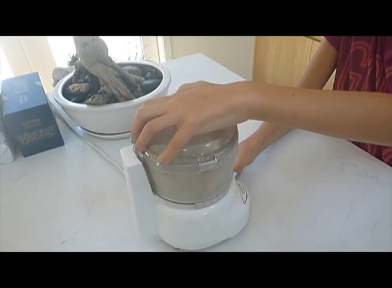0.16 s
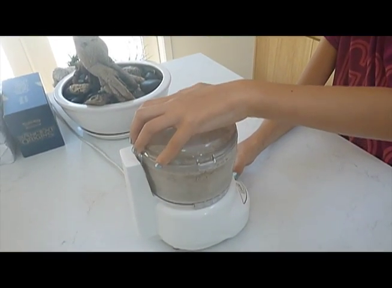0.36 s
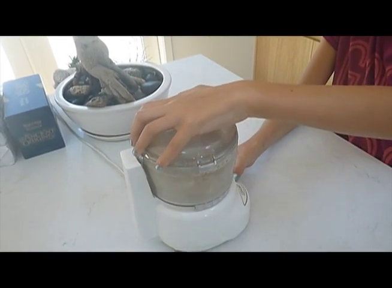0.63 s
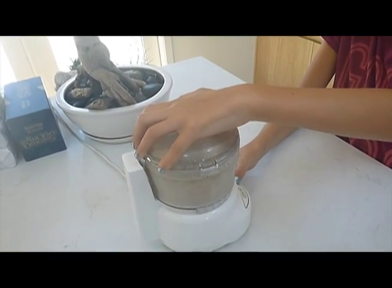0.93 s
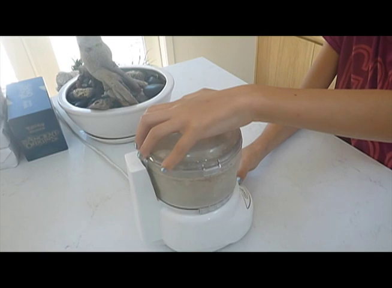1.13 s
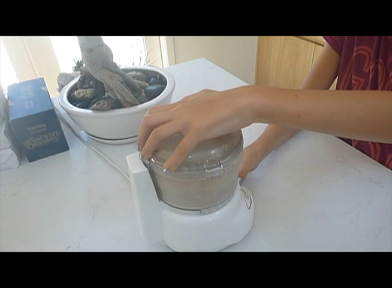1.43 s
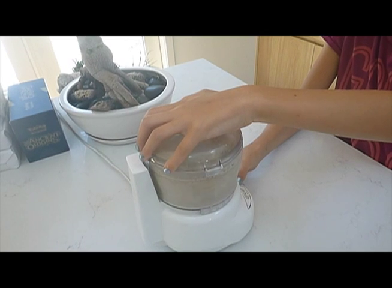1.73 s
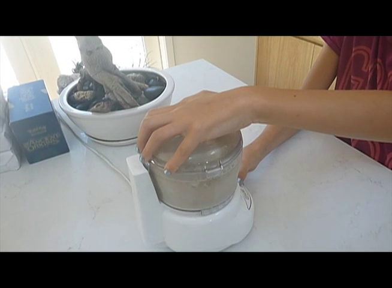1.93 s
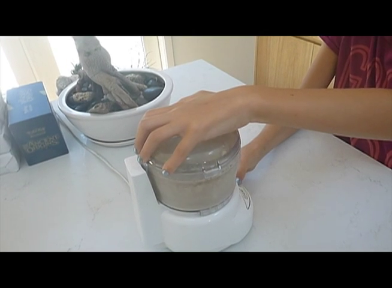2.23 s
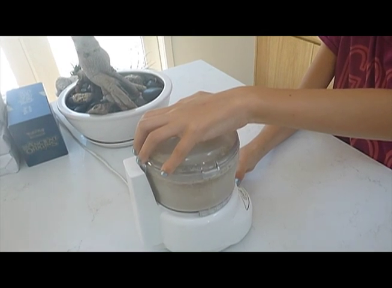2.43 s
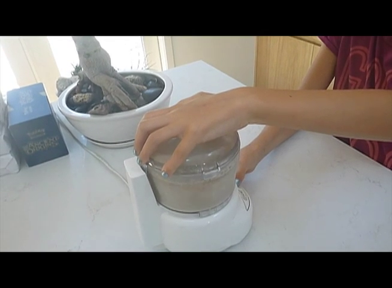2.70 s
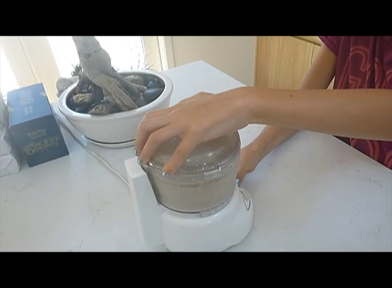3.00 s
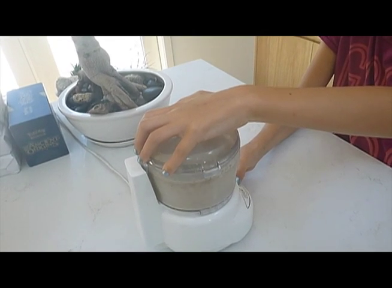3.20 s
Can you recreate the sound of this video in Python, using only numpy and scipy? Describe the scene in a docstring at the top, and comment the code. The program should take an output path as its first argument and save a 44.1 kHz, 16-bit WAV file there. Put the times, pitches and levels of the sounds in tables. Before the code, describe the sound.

A small electric food processor grinds nuts continuously for about 3.3 seconds, already running at the start and cut off while running. A dense gritty hiss and rattle fills the plastic bowl, strongest in the first 0.1 seconds. Sharp cracks cluster before 0.2, hit hard near 0.6, 1.97 and 2.75-2.95, and thin between 2.1 and 2.35. Dull knocks, brief lid rings and low wavering hum; close, centred, lightly reverberant kitchen.

```python
"""Food processor grinding nuts

A small electric food processor stands on a kitchen counter: two sine hum lines waver over low-passed noise.
Coloured random impacts are powder, crumbs and clumps whirled round a plastic bowl; ringing ticks are grit.
Hard pieces crack in noise bursts led by a click, clumps knock, and the lid rings in short sines.
Bowl resonances shape every contact, decaying sines thump the base, and a noise tail adds the room."""
import sys
import numpy as np
from scipy import signal
from scipy.fft import rfft, irfft
from scipy.io import wavfile

SR = 44100
rng = np.random.default_rng(int(sys.argv[2]) if len(sys.argv) > 2 else 0)


def to_wav(sig):
    """Store sig (one row per channel, or 1-D mono) as 16-bit WAV at the path in sys.argv[1].

    Samples outside -1..1 are clipped; the rate is SR.
    """
    pcm = np.clip(np.atleast_2d(sig), -1, 1) * 32767
    pcm = np.round(pcm).astype(np.int16)
    wavfile.write(sys.argv[1], SR, pcm.T)  # frames by channels


N = 147735  # samples, 3.35 s

# How hard the meal is thrown against the wall; only departures from the mean are used.
# Each row: time in seconds, level in dB.
LOAD = [(0.0, -30), (0.1, -29.5), (0.125, -36.5), (0.22, -31.5), (0.31, -34), (0.39, -33), (0.49, -31.5),
        (0.62, -33), (0.71, -32.5), (0.99, -33.5), (1.2, -33), (1.41, -33.5), (1.5, -32.5), (1.74, -34),
        (1.92, -32.5), (1.95, -30), (2.0, -33.5), (2.4, -33.5), (2.7, -32.5), (2.76, -31), (3.03, -33.5),
        (3.35, -33)]


def from_db(db):
    """Amplitude ratio: 20 dB is a factor of ten."""
    return 10 ** (np.asarray(db) / 20)


def rms_one(x):
    """Normalization: divide by the root mean square, giving unit power."""
    return x / np.sqrt(np.mean(x ** 2) + 1e-20)


def in_time(rows):
    """Linear interpolation: a control curve at every sample from rows of (seconds, value)."""
    return np.interp(np.arange(N) / SR, *np.transpose(rows))


def drift(rate_hz):
    """Low-pass noise: two equal poles leave slow random fluctuation of about unit spread."""
    step = 40  # samples between drawn values
    pole = np.exp(-2 * np.pi * step * rate_hz / SR)
    settling = 2000
    noise = rng.standard_normal(N // step + 2 + settling)
    slow = signal.lfilter([1], [1, -2 * pole, pole * pole], noise)[settling:]
    return np.interp(np.arange(N) / step, np.arange(len(slow)), rms_one(slow))


def load_swing():
    """Modulation depth: departure of the load from its mean, in dB."""
    load_db = in_time(LOAD)
    return load_db - load_db.mean()


def colour(x, spectrum):
    """Minimum-phase filtering: a folded cepstrum gives a causal response; white noise keeps its power."""
    size = 4096
    hz, db = np.transpose(spectrum)
    bin_hz = np.arange(size // 2 + 1) * SR / size
    gain = rms_one(from_db(np.interp(np.log(bin_hz + 1), np.log(hz), db)))
    cepstrum = irfft(np.log(gain))[:size // 2]
    cepstrum[1:] *= 2
    response = irfft(np.exp(rfft(cepstrum, size)))
    return signal.fftconvolve(x, response)[:N]


def grains(per_s, spread_db, largest):
    """Poisson-like impacts: random times, signs and exponentially spread dB sizes; unit power."""
    size_db = spread_db * np.minimum(rng.exponential(1, N), largest)
    impacts = from_db(size_db) * rng.choice([-1, 1], N)
    return rms_one(impacts * (rng.random(N) < per_s / SR))


def bursts(rows, length_s, edge_s):
    """Dense fracture: random-sign noise builds, holds and decays; the rise is twice as fast as the decay."""
    t, envelope = np.arange(N) / SR, np.zeros(N)
    for s, db in rows:
        near = slice(max(int((s - .04) * SR), 0), int((s + .08) * SR))
        outside = np.maximum(2 * (s - t[near]), t[near] - s - length_s)
        envelope[near] += from_db(db) * np.exp(-np.maximum(outside, 0) / edge_s)
    return envelope * rng.choice([-1, 1], N)


def kitchen(x):
    """Diffuse reverberation: convolution with decaying noise from counter and walls."""
    room_db, t60_s = -15.5, 0.23  # energy of the tail's response, time to fall by 60 dB
    t = np.arange(SR // 2) / SR
    tail = rng.standard_normal(len(t)) * from_db(-60 * t / t60_s)
    tail *= t > .003  # the first 3 ms are silent
    tail /= np.sqrt(np.sum(tail ** 2))
    return from_db(room_db) * signal.fftconvolve(x, tail)[:N]


def base():
    """Damped oscillation: a jolt sets the machine bouncing briefly on its feet."""
    # Thumps on the counter. Each row: start in seconds, level in dB before decay.
    thumps = [(.145, -48), (.596, -52), (1.011, -51), (2.755, -39)]
    thump_hz, decay_s = 62.3, 0.0052
    out = np.zeros(N)
    for s, db in thumps:
        age = np.maximum(np.arange(N) / SR - s, 0)
        out += from_db(db) * np.exp(-age / decay_s) * np.sin(2 * np.pi * thump_hz * age)
    return out


def motor():
    """Harmonic radiation: two wavering lines an octave apart swell over the rumble of the shaking housing."""
    # Motor speed before the wobble. Each row: time in seconds, pitch of the second harmonic in Hz.
    speed = [(0, 286.8), (.15, 283), (.35, 284), (.55, 291.2), (.8, 282), (1.05, 294), (1.2, 285.8),
             (1.6, 289.2), (1.9, 285.8), (2.15, 284.7), (2.55, 286.7), (3.05, 289.9), (3.35, 282.2)]
    # Second harmonic of the hum. Each row: time in seconds, level in dB before its trim.
    hum_upper = [(0.0, -67), (0.02, -39), (0.05, -54), (0.09, -44), (0.12, -65), (0.14, -51.5), (0.17, -59),
                 (0.19, -40), (0.3, -51.0), (0.38, -41.5), (0.69, -57), (0.73, -31), (0.75, -70),
                 (0.78, -41.5), (0.88, -50), (0.92, -37), (0.95, -48), (0.97, -39.5), (1.0, -50),
                 (1.14, -50), (1.17, -37), (1.18, -40.5), (1.35, -60), (1.65, -40.5), (1.67, -58),
                 (2.03, -40.5), (2.11, -51), (2.15, -38), (2.19, -47), (2.32, -66), (2.38, -43),
                 (2.52, -63.0), (2.54, -38.5), (2.721, -56), (2.731, -40), (2.83, -53), (2.85, -33.5),
                 (2.88, -52), (2.95, -44), (2.97, -44), (3.06, -43), (3.07, -48), (3.11, -34.5),
                 (3.13, -48), (3.239, -50), (3.28, -35.5), (3.31, -58), (3.34, -38.5)]
    # Fundamental of the hum. Each row: time in seconds, level in dB before its trim.
    hum_lower = [(0.0, -47), (0.03, -44.5), (0.33, -77), (0.63, -45), (0.67, -55), (0.86, -44), (1.1, -56),
                 (1.47, -51.0), (1.49, -58.5), (2.11, -56.5), (2.18, -52), (2.24, -57.5), (2.95, -53.5),
                 (2.99, -63), (3.34, -57)]
    # Rumble colour before the low-pass. Each row: frequency in Hz, relative density in dB per Hz.
    rumble_colour = [(25, -38), (65, -14), (100, -12.5), (150, 2), (205, -2), (245, -5), (295, 5),
                     (350, -10.5), (480, -22), (1000, -33)]
    upper_trim_db, lower_trim_db = -4.5, -4
    wobble = .016  # spread of the pitch as a share
    rumble_db = -51
    housing_hz = 615  # the housing radiates little above this

    upper_hz = in_time(speed) * (1 + wobble * drift(25.0))
    phase = np.pi * np.cumsum(upper_hz) / SR  # of the fundamental, half the tabulated pitch
    upper = in_time([(s, from_db(db + upper_trim_db)) for s, db in hum_upper]) * np.sin(2 * phase)
    lower = in_time([(s, from_db(db + lower_trim_db)) for s, db in hum_lower]) * np.sin(phase)
    hum = np.sqrt(2) * (upper + lower)  # the levels are RMS
    rumble = from_db(rumble_db + 2.5 * drift(7.8)) * colour(rng.standard_normal(N), rumble_colour)
    low_pass = signal.butter(4, housing_hz, fs=SR, output="sos")
    return hum + signal.sosfilt(low_pass, rumble)


def bowl(x):
    """Modal resonance: second-order peaks are the plastic bowl and lid, two deep dips what the bowl swallows."""
    # Resonances of bowl and lid. Each row: frequency in Hz, width in Hz, gain in dB before the overall trim.
    resonances = [(678, 47, 7.5), (820, 102, 7.5), (1017, 100, 6), (1500, 150, 3), (2215, 110, 6.5),
                  (2924, 177, 4), (3300, 270, 5.5), (4085, 550, 3.5), (5470, 293, 8.5), (5980, 167, 7),
                  (8020, 530, 3.5), (10570, 170, 3.5)]
    # Absorbed bands. Each row: frequency in Hz, width in Hz, gain in dB before the overall trim.
    notches = [(1912, 190, -32), (2400, 115, -27)]
    for hz, width_hz, db in list(resonances) + list(notches):
        damping, cosine, gain = np.pi * width_hz / SR, np.cos(2 * np.pi * hz / SR), from_db(db)
        zeros = [1 + damping * gain, -2 * cosine, 1 - damping * gain]
        poles = [1 + damping, -2 * cosine, 1 - damping]
        x = signal.lfilter(zeros, poles, x)
    return x * from_db(-4)


def lid():
    """Impulse response: each piece flung upward makes the lid's ring swell and die at a random pitch."""
    # Hits on the lid. Each row: start in seconds, peak level in dB before trim and bowl.
    lid_hits = [(0.368, -23), (0.617, -26.5), (.657, -27.5), (1.184, -24.5), (1.472, -27), (1.949, -33),
                (2.36, -27), (2.524, -26.5), (2.581, -29), (2.672, -26), (2.953, -33)]
    ring_hz, trim_db, rise_s = 2225, -3, .0015
    pitch_spread = 0.024  # a share, scaled by the draw below
    out = np.zeros(N)
    for s, db in lid_hits:
        age = np.maximum(np.arange(N) / SR - s, 0)
        hz = ring_hz * (1 + pitch_spread * rng.uniform(-1.3, 1))
        swell = age / rise_s * np.exp(1 - age / rise_s)  # peaks at 1 after the rise
        out += from_db(db + trim_db) * swell * np.sin(2 * np.pi * hz * age)
    return out


def knocks():
    """Soft impact: a longer, rounded contact makes larger clumps land dully on the wall."""
    # Knocks of clumps. Each row: start in seconds, level in dB before trim, colour and bowl.
    knock_rows = [(0.029, -29), (0.49, -37), (0.529, -30), (0.723, -32), (0.876, -30.5), (1.155, -32),
                  (1.341, -31), (1.472, -36), (1.493, -33), (1.716, -30.5), (1.777, -36), (2.581, -35),
                  (2.674, -31), (3.291, -34)]
    # Knock colour. Each row: frequency in Hz, relative density in dB per Hz.
    knock_colour = [(60, -29), (200, 17.5), (450, -9), (780, 12.5), (1300, -10.5), (1800, -9), (3200, -0.5),
                    (8000, -7)]
    trim_db, length_s, edge_s = -5, 0.006, 0.0018
    levels = [(s, db + trim_db) for s, db in knock_rows]
    return colour(bursts(levels, length_s, edge_s), knock_colour)


def grit(count=9):
    """Struck resonators: hard grains excite one of several pitches for a few cycles, more often under load."""
    grit_db, per_s = -42.5, 240  # level before the bowl, rate at mean load in dB
    low_hz, high_hz = 2980, 13700
    cycles = 24  # cycles in which a ring falls by 60 dB
    tilt_db = 1  # rise towards the high pitches

    born = rng.random(N) < per_s * from_db(load_swing()) / SR
    size_db = 3.8 * np.minimum(rng.exponential(1, N), 2.5)
    clicks = born * from_db(size_db) * rng.choice([-1, 1], N)
    dealt, out = rng.integers(0, count, N), np.zeros(N)
    for k, hz in enumerate(np.geomspace(low_hz, high_hz, count)):
        radius, angle = from_db(-60 * hz / (cycles * SR)), 2 * np.pi * hz / SR
        struck = clicks * (dealt == k) + 1e-18 * rng.random(N)  # inaudible floor keeps the power above zero
        ring = signal.lfilter([1, 0, -1], [1, -2 * radius * np.cos(angle), radius * radius], struck)
        out += from_db(tilt_db * k / count) * rms_one(ring)
    return from_db(grit_db) * rms_one(out)


def cracks():
    """Brittle fracture: hard pieces break on the blade in one sharp impulse, a bright snap and a crush."""
    # Cracks. Each row: start in seconds before a common delay, level in dB before trim, colour and bowl,
    # level of the bright snap in dB relative to the crack before its own trim.
    crack_rows = [(0.0017, -20.5, -10), (0.01, -21, -4), (0.0397, -12.5, -10), (0.06, -23, -11),
                  (0.0813, -17, -5), (0.095, -15.5, -11), (0.1068, -22, -7), (0.1429, -15, 2),
                  (0.1803, -19.5, 2), (0.2057, -20, 2), (0.348, -14.5, -6), (0.367, -21.5, -12),
                  (0.486, -21, -8), (0.5003, -20, -6), (0.5408, -20, 1), (0.5551, -16.5, 3),
                  (0.5938, -10.5, 0), (0.682, -18.5, -14), (0.7028, -19, -5), (0.7208, -17, -12),
                  (0.734, -23, 2), (0.8186, -17.0, -12), (0.8737, -22, -8), (0.9266, -16.5, 2),
                  (1.01, -17.5, 9), (1.15, -17.5, -12), (1.1827, -20, -10), (1.3398, -19.5, -1),
                  (1.3544, -17.5, -12), (1.3773, -19, -10), (1.3954, -17, -4), (1.4923, -17.5, -12),
                  (1.5556, -17.5, 2.5), (1.5878, -20.5, 9.5), (1.6198, -19, -12), (1.6905, -19.5, -10),
                  (1.759, -23.5, 3), (1.8222, -18.5, -9), (1.9403, -29, -6), (1.9673, -13.5, -18),
                  (2.065, -37, -13), (2.3504, -21, -3), (2.579, -20.5, -12), (2.67, -20.5, -13),
                  (2.7307, -16.5, -2), (2.7722, -13.5, -15.5), (2.8387, -23, -11), (2.9124, -20.5, -45),
                  (2.9506, -14, -24), (2.9853, -18, 0.5), (3.3063, -22.0, 2), (3.3214, -21, -13)]
    # Crack colour. Each row: frequency in Hz, relative density in dB per Hz.
    crack_colour = [(60, -66), (480, -9.5), (1500, -6.5), (3000, 5.5), (4800, 3.5), (7000, -4),
                    (11500, -18), (15000, -8)]
    trim_db, delay_s, length_s, edge_s = -8.5, 0.001414, .0025, 0.00073
    fracture_db, snap_trim_db, snap_hz = 10.5, 0.5, 8300

    s, db, snap_db = np.transpose(crack_rows)
    s, db = s + delay_s, db + trim_db
    fracture = np.zeros(N)
    fracture[np.clip(s * SR, 0, N - 1).astype(int)] = from_db(db + fracture_db)
    crush = colour(fracture + bursts(zip(s, db), length_s, edge_s), crack_colour)
    snap = bursts(zip(s, db + snap_db + snap_trim_db), length_s / 3, edge_s=0.0006)
    high_pass = signal.butter(2, snap_hz, "high", fs=SR, output="sos")
    return crush + signal.sosfilt(high_pass, snap)


def meal():
    """Granular flow: powder, crumbs and soft clumps hit the wall in flurries that follow the load."""
    # Colours of powder, crumbs and clumps. Each row: frequency in Hz, relative density in dB per Hz.
    powder_colour = [(60, -30), (200, 2), (480, -8.5), (1200, -5.5), (2800, 4), (4800, 4), (6800, 3.5),
                     (9000, -2), (11300, -3), (13200, 2), (15000, 7.5), (16000, -3.5)]
    crumb_colour = [(60, -32), (200, -13), (480, -9.5), (1200, -5), (2800, 5.5), (4800, 1.5), (6800, -17),
                    (9000, -1.5), (11500, -15), (15000, -3)]
    clump_colour = [(60, -42), (200, -16), (450, -18.5), (800, 2), (1300, -8.5), (2200, 1.5), (3200, -20),
                    (8000, -43)]
    powder_db, crumb_db, clump_db = -35, -35, -50  # before load, flurry and bowl
    powder_follows, crumb_follows, clump_follows = 0.85, 1.6, 0.81  # dB per dB of load

    load_db = load_swing()
    flurry = drift(79)
    powder_level = from_db(powder_db + powder_follows * load_db + 1.3 * flurry)
    crumb_level = from_db(crumb_db + crumb_follows * load_db + 1.82 * flurry)
    clump_level = from_db(clump_db + clump_follows * load_db + 2.13 * drift(40.0))
    powder = powder_level * grains(14000, spread_db=3.0, largest=5.1)
    crumbs = crumb_level * grains(2200, spread_db=1.5, largest=4.0)
    clumps = clump_level * grains(500, spread_db=0.5, largest=2.6)
    return colour(powder, powder_colour) + colour(crumbs, crumb_colour) + colour(clumps, clump_colour)


def scene():
    """Superposition: all sources add straight ahead, alike in both ears."""
    grinding = bowl(meal() + grit() + cracks() + knocks() + lid())
    mid = grinding + kitchen(grinding) + motor() + base()
    return np.array([mid, mid])


def record(dry):
    """Band limitation: a linear-phase low-pass cuts the top steeply."""
    cutoff_hz = 15800
    taps = signal.firwin(601, cutoff_hz, fs=SR, window="blackman")
    return signal.fftconvolve(dry, taps[None], mode="same", axes=1)


dry = scene()
out = record(dry)
to_wav(out)
```